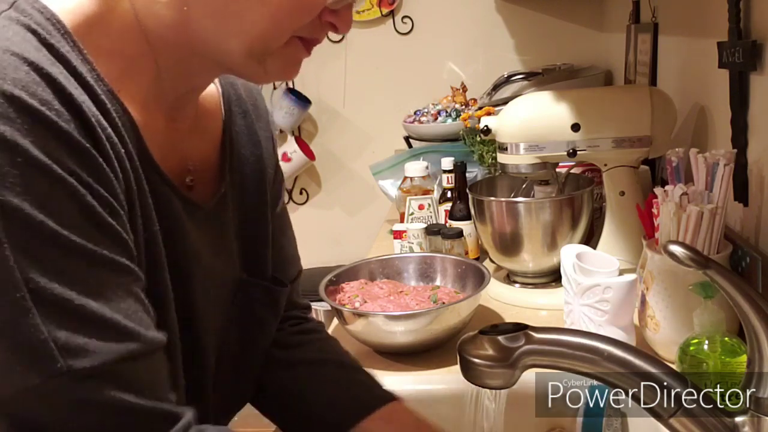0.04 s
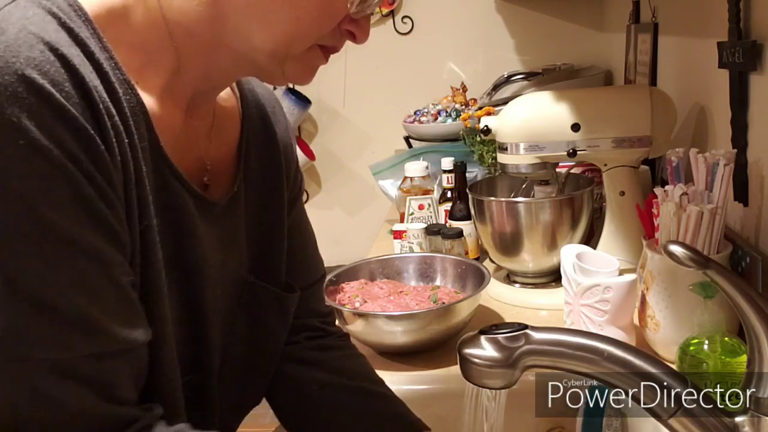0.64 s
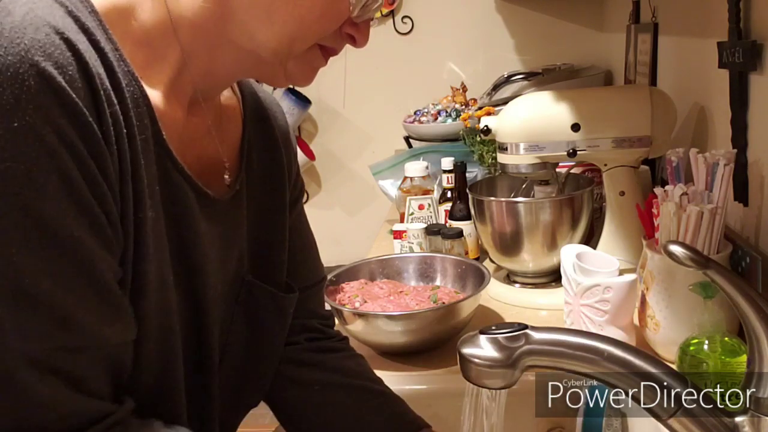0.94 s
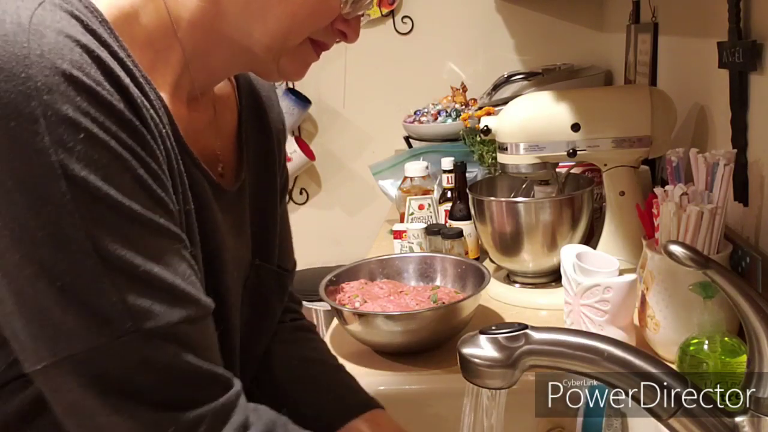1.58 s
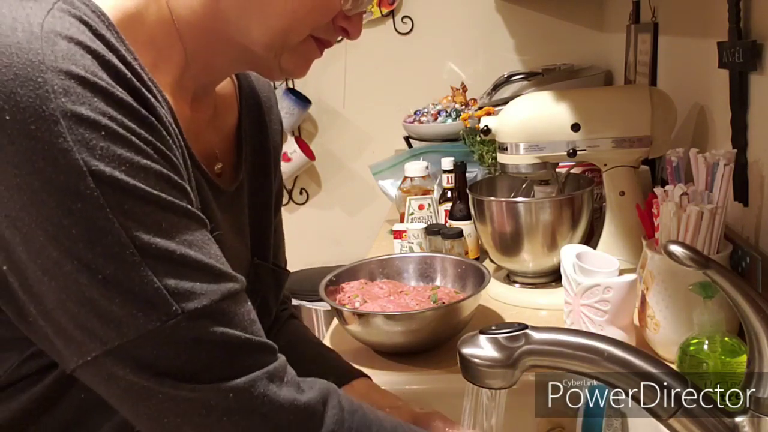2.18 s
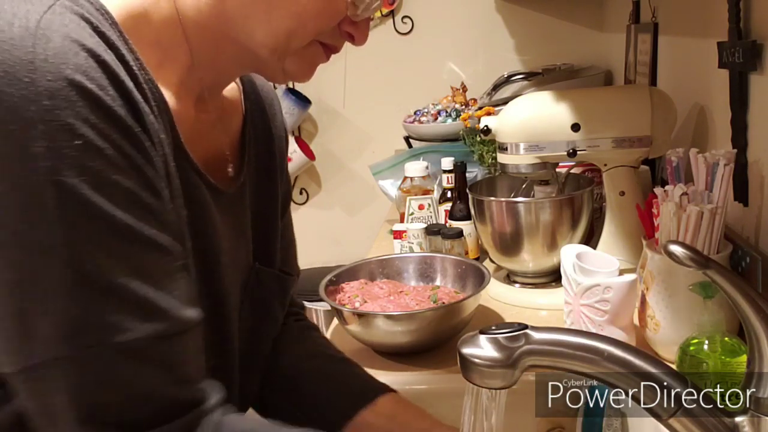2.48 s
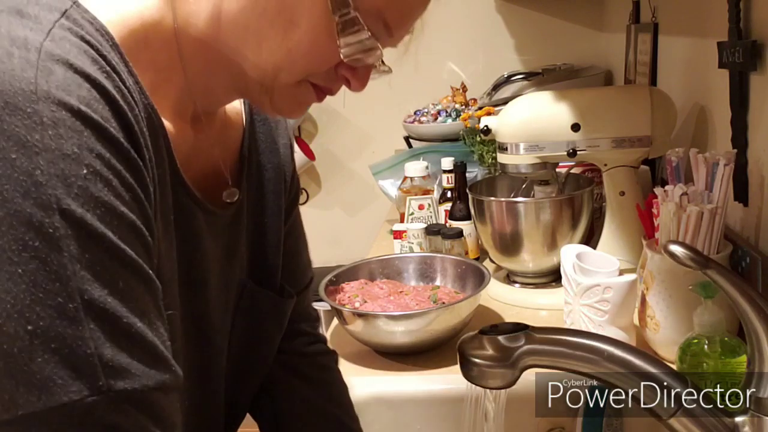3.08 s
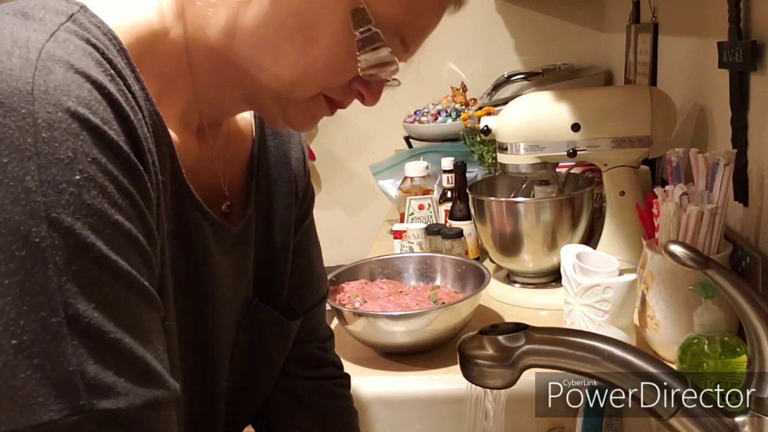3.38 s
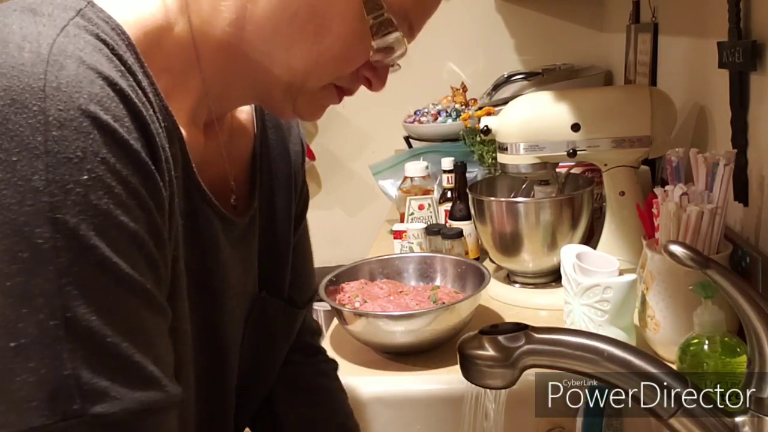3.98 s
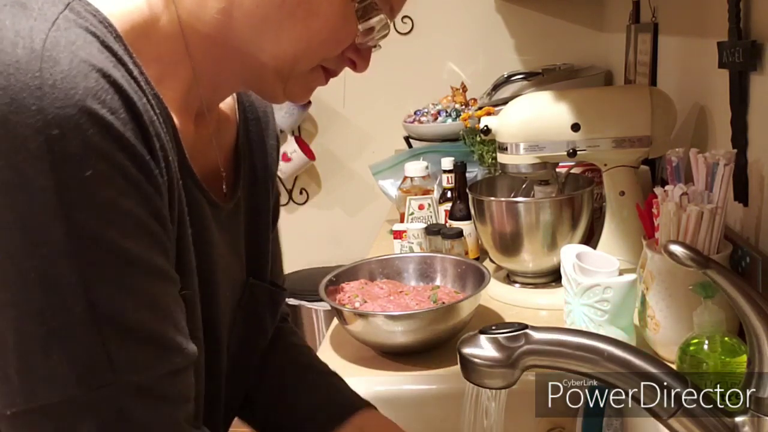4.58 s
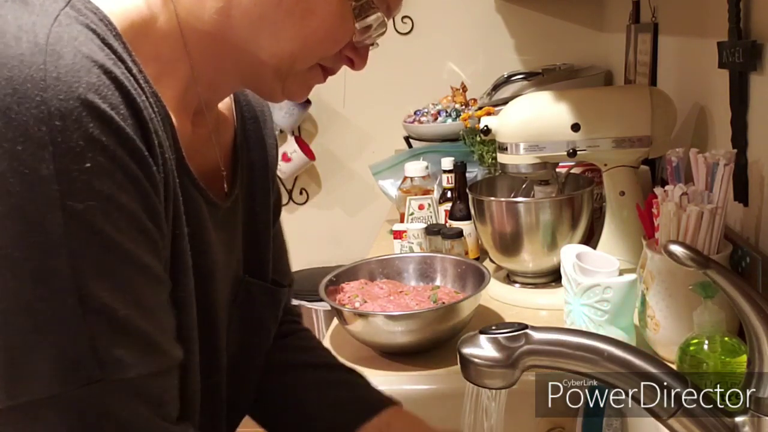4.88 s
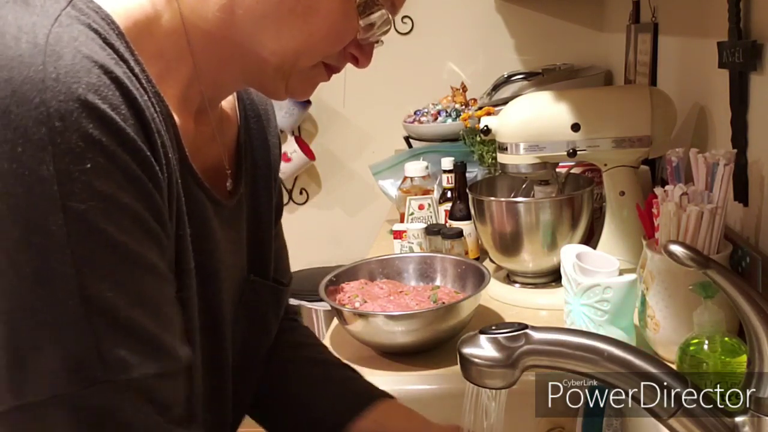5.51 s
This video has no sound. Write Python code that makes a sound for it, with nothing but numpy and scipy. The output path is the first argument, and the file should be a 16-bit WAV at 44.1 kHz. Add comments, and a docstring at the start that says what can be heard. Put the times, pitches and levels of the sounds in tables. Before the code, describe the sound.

Hands rinse under a running kitchen faucet, with wet slaps, squelches and water drumming on the basin over a steady fizz.

```python
"""Washing hands under a kitchen tap

The airy stream fizzes and the tap's valve sings, with the sink close by on the left.
Water falling from the hands splashes, glugs and drums on the basin. Wet palms squelch,
something small clinks twice, and the sink and kitchen echo over a low hum."""
import sys
import numpy as np
from scipy import signal
from scipy.fft import rfft, irfft, next_fast_len
from scipy.io import wavfile
from scipy.ndimage import map_coordinates

SR = 44100
rng = np.random.default_rng(int(sys.argv[2]) if len(sys.argv) > 2 else 0)


def dump(signal):
    """Clip the signal to [-1, 1] and save it as 16-bit WAV at the path in sys.argv[1]."""
    limited = np.clip(np.atleast_2d(signal).T, -1, 1)
    pcm = np.round(limited * 32767).astype(np.int16)
    wavfile.write(sys.argv[1], SR, pcm)


N = 249165

# tone colours, from bass to treble: (frequency [Hz], level [dB])
RUMBLE_TONE = [(38, -40), (55, -28), (80, -10), (135, 3.5), (300, -8.5), (400, 1.5), (580, -13), (800, -31),
               (1100, -8), (1500, -15), (8000, -45)]
SPLATTER_TONE = [(900, -25), (3000, -4), (8000, -27)]
PALM_TONE = [(300, 7), (650, 5), (850, 19), (1200, 2.5), (1800, 17.5), (2600, 11.5), (5000, -43)]
FIZZ_TONE = [(1200, -77), (2200, -9), (3400, -3.5), (4500, -4), (6300, 3), (8000, 1.5), (11000, 7.5),
             (15500, 5.5)]
SLOSH_TONE = [(350, -6.5), (800, 16), (1200, 13), (2600, 4), (4500, 16), (8000, -11)]
SLAP_TONE = [(500, -11), (1500, -9), (2500, 9.5), (4300, 10.5), (6500, 10), (9000, 5.5), (15500, -8)]
MIST_TONE = [(4000, -50), (7000, 17), (9500, 21), (15500, 17.5)]
VALVE_TONE = [(600, 12), (920, 21), (1350, -29), (1800, -26)]
THUD_TONE = [(30, -5.5), (100, -12.5), (400, -9.5), (800, -12), (2000, -44)]  # water strikes softly
# how things ring: (pitch [Hz], width [Hz], level [dB])
VALVE_RINGS = [(938, 24, 0), (1330, 60, -19)]
FLOOR_RINGS = [(70, 74, -41), (134.6, 43.4, 0), (150, 48, -3.5)]  # the floor of the sink
HOLLOW_RINGS = [(222, 42, -3), (268, 38, 0), (405, 60, -23)]  # the low, hollow glugging of water plunging into the sink
# how loudness changes: (time [s], level [dB])
SONG_LEVEL = [(0.4, -55.5), (1.2, -53.5), (2.9, -53.5), (3.3, -55.5)]  # the valve, later shielded by the hands
SPRAY_LEVEL = [(0.0, -48.5), (0.38, -48), (0.55, -49.5), (1.67, -43), (2.39, -41.5), (2.66, -42),
               (3.07, -40.5), (3.68, -42), (4.53, -43.5), (4.78, -40), (5.29, -39.5), (5.65, -45)]  # louder as the hands move deeper into the stream
SLOSH_LEVEL = [(0.0, -57.5), (1.04, -59), (3.6, -48.5), (3.96, -49), (4.59, -46.5), (5.65, -51.5)]  # coarser water running over the hands
# the spray eases as the hands leave the stream: (middle time [s], length [s])
LULLS = [(0.762, 0.035), (1.494, 0.02), (1.907, 0.023), (2.107, 0.055), (2.557, 0.12), (2.813, 0.069),
         (3.067, 0.037), (3.973, 0.055), (4.416, 0.12), (4.536, 0.03), (4.658, 0.019), (5.181, 0.05)]
# water pouring off the hands:
# (time [s], length [s], floor level [dB], hollow glugging level [dB], thinning [dB/s])
POURS = [(3.127, 0.68, -36, -38.5, 26), (3.71, 0.53, -45.5, -50.5, -4)]
# single blobs of water landing in the sink: (time [s], level [dB])
DOLLOPS = [(1.08, -33), (1.324, -42), (1.425, -37.5), (1.71, -45), (2.12, -40.5), (2.409, -34),
           (2.777, -35), (3.148, -36.5), (3.286, -27), (3.439, -28), (3.597, -28.5), (4.67, -37.5),
           (5.525, -36.5)]
# large bubbles, from bright pings to hollow plops: (time [s], pitch [Hz], level [dB])
BIG_BUBBLES = [(3.305, 4950, -22.5), (3.396, 3550, -27), (3.432, 4240, -29), (3.433, 5480, -20),
               (3.473, 3920, -25), (3.605, 5670, -20), (3.769, 4330, -18), (4.569, 1034, -34),
               (4.578, 1504, -30), (4.79, 890, -32), (4.799, 7550, -24.5), (4.889, 4150, -31),
               (4.896, 882, -28.5), (5.227, 5370, -19), (5.44, 840, -29.5)]
# light knocks: (time [s], pitch [Hz], level [dB], top ring pitch [Hz], top ring level [dB])
CLINKS = [(4.199, 4697, -23.5, 12385, -23.5), (4.224, 4325, -23.5, 11820, -31)]
# the lower rings of a clink: (pitch multiple, level [dB], time to fade by 60 dB [s])
CLINK_RINGS = [(1.0, 0, .13), (1.26, -8, .11), (1.62, -13, .08)]
# wet palms pressing together: (time [s], level [dB], pitch of their hollow [Hz])
SQUELCHES = [(0.243, -34, 950), (0.37, -46.5, 1990), (1.089, -37.5, 1790), (1.712, -44, 2450),
             (1.748, -38.5, 2170), (2.411, -38.5, 2500), (4.567, -29.5, 1170), (4.583, -35, 1610),
             (4.686, -36, 1845), (4.769, -38.5, 1780), (4.894, -33, 905), (5.118, -36, 1500),
             (5.21, -37, 900), (5.401, -33.5, 1420), (5.429, -34.5, 990), (5.56, -36.5, 4500)]
# big slaps of water: (time [s], level [dB], pitch [Hz], mist level [dB], swell time [s])
SPLASHES = [ (0.657, -38.5, 6260, 6, 0.0074), (0.844, -32, 7800, 5, 0.0038),
            (1.541, -24, 3360, 2.5, 0.0012), (1.792, -32, 4200, -18, 0.0077),
            (2.379, -23.5, 6260, -1, 0.0019), (2.6434, -23.5, 6530, 3, 0.00097),
            (2.925, -20.5, 4530, 6, 0.0025), (3.005, -31.5, 8700, 6, 0.0023),
            (3.108, -31, 4370, 7.5, 0.0065), (3.135, -20, 5660, 1, 0.0022),
            (3.431, -18, 4400, -0.5, 0.0021), (3.467, -24.5, 5240, 0, 0.0083),
            (3.603, -19, 7700, -4, 0.0027), (3.766, -21.5, 4580, -1.5, 0.002),
            (4.221, -32, 7300, -2, 0.012), (4.671, -22, 4160, 0, 0.0029), (4.793, -28.5, 5800, -15, .004),
            (4.877, -24, 4250, -1, 0.0054), (5.015, -24, 4240, 1, 0.0028), (5.131, -21, 4860, -12, 0.0024),
            (5.285, -23.5, 7060, 6.5, 0.0018), (5.354, -21, 4870, -1, 0.0035)]
# small flicks of water between them: (time [s], level [dB], pitch [Hz])
FLICKS = [(0.201, -33.5, 2160), (0.407, -32.5, 6250), (0.69, -34.5, 4130), (0.973, -33, 7470),
          (1.044, -33.5, 5250), (1.15, -26.5, 5550), (1.434, -37, 3250), (1.626, -29.5, 3270),
          (1.692, -28.5, 6260), (1.827, -26.5, 4940), (1.936, -34, 3520), (2.004, -26.5, 4700),
          (2.034, -26, 2720), (2.164, -26, 3370), (2.485, -28, 2340), (2.561, -30, 6540),
          (2.724, -28, 5440), (2.75, -26.5, 8050), (2.855, -26.5, 4580), (2.873, -33, 5210),
          (2.916, -22, 4900), (2.929, -25.5, 2180), (3.022, -25, 7440), (3.128, -24.5, 6260),
          (3.179, -26.5, 3560), (3.398, -25.5, 6200), (3.741, -24, 4630), (3.877, -26, 3100),
          (3.89, -26, 3440), (4.024, -30, 3600), (4.454, -29.5, 2870), (4.731, -29, 7030),
          (4.83, -27.5, 5400), (4.989, -24.5, 5800), (5.1, -28, 5500), (5.114, -26, 5360),
          (5.483, -23.5, 5400), (5.509, -27, 4810), (5.544, -25.5, 4220), (5.575, -29, 2680)]
# how long echoes last: (frequency [Hz], time to fade by 60 dB [s])
KITCHEN_FADE = [(200, 0.17), (3000, 0.31), (14000, 0.091)]
SINK_FADE = [(1000, 0.15), (10000, 0.1)]
# how much louder the left side is: (frequency [Hz], left minus right [dB])
LEFT_BOOST = [(60, 7.5), (600, 5.5), (930, 10), (1700, 5), (2500, 8.5), (7000, 11.5), (9000, 0), (15000, 3)]
# how alike left and right sound: (frequency [Hz], likeness [0 to 1])
LIKENESS = [(100, 0.94), (250, 0.87), (500, 0.74), (1000, 0.5), (2500, 0.038), (10000, 0.035)]


def amp(db):
    """Turn decibels into a number to multiply by."""
    return 10 ** (np.asarray(db) / 20)


def unit(x):
    """Scale a sound to an average power of 1."""
    return x / np.sqrt(np.mean(x ** 2) + 1e-20)


def along(points, hz):
    """Read between (frequency, value) points, with octaves evenly spaced."""
    f, v = np.transpose(points)
    return np.interp(np.log(hz + 1), np.log(f + 1), v)


def curve(points):
    """Join (time, value) points into one value per sample."""
    return np.interp(np.arange(N) / SR, *np.transpose(points))


def wobble(rate, n=N):
    """A smooth curve through `rate` random values a second."""
    return map_coordinates(rng.standard_normal(int(n * rate / SR) + 4), [np.arange(n) * rate / SR])


def filtered(x, response):
    """Multiply each frequency in a sound by response(frequency)."""
    n = x.shape[-1]
    m = next_fast_len(n + min(n // 4, SR // 8), True)
    return irfft(rfft(x, m) * response(np.fft.rfftfreq(m, 1 / SR)), m)[..., :n]


def coloured(x, tone):
    """Give a sound a tone colour."""
    return filtered(x, lambda hz: amp(along(tone, hz)))


def resonate(x, rings):
    """Make a sound ring at each (pitch, width, level)."""
    return filtered(x, lambda f: sum(
        (-1) ** k * amp(db) * 1j * f * width / (hz * hz - f * f + 1j * f * width)
        for k, (hz, width, db) in enumerate(rings)))


def add(track, s, sound):
    """Mix a sound into the track at s seconds."""
    part = track[:, max(round(s * SR), 0):][:, :sound.shape[-1]]
    part += sound[:, :part.shape[-1]]


def droplets(n, rate, spread_db):
    """Tiny hits of unequal size, `rate` a second, each with its own strength in the two channels."""
    chance, size = rng.random(n), rng.uniform(-0.43, 1, n)
    return unit((chance < rate / SR) * amp(spread_db * size) * rng.standard_normal((2, n)))


def burst(t, swell_s, linger_db, fade_s=0.05):
    """The loudness of a slap: it swells and lets go, and its scattered drops land a little later."""
    u = t / swell_s
    return u * np.exp(1 - u) + amp(linger_db - 60 * t / fade_s) * (1 - np.exp(-u))


def echoes(x, fade_times):
    """Echoes fade at each frequency's own speed and keep changing, as when arms move nearby."""
    out, hop = np.zeros((2, N)), SR // 8
    for start in range(0, N, hop):
        hz, t, noise = signal.stft(rng.standard_normal((2, SR // 4)), SR, nperseg=128)
        fade = amp(-60 * t / along(fade_times, hz)[:, None])
        tail = signal.istft(noise * fade, SR, nperseg=128)[1]
        tail /= np.linalg.norm(tail[0])
        add(out, start / SR + 0.001504, signal.fftconvolve(x[:, start:start + hop], tail, axes=1))
    return out


def left_and_right(pair, lead_s=0.00009):
    """Two channels become left and right: alike in the bass, louder and earlier on the sink's side."""
    turn = lambda hz: np.arccos(along(LIKENESS, hz)) / 2
    mid, side = filtered(pair, lambda hz: np.array([np.cos(turn(hz)), np.sin(turn(hz))]))
    lean = lambda hz: amp(np.outer([.5, -.5], along(LEFT_BOOST, hz)))
    lead = lambda hz: np.exp(2j * np.pi * np.outer([.5, -.5], hz) * lead_s)
    stereo = np.array([mid + side, mid - side])
    return filtered(stereo, lambda hz: lead(hz) * lean(hz) / lean(hz).mean(axis=0))


def background(hum_hz=59):
    """The kitchen rumbles and an appliance hums."""
    hum = amp(-61 + 3.5 * wobble(7)) * np.sin(2 * np.pi * hum_hz * np.arange(N) / SR)
    rumble = amp(-55) * unit(coloured(rng.standard_normal((2, N)), RUMBLE_TONE))
    return rumble + np.outer([1, 0], hum)  # the first channel goes to both left and right


def valve():
    """The tap's valve keeps itself ringing, so its note is steadier than plain noise."""
    ringing = resonate(rng.standard_normal((2, N)), VALVE_RINGS)
    song = signal.hilbert(coloured(ringing, VALVE_TONE))
    steadied = song.real / np.sqrt(np.abs(song))  # abs(song) is its strength at each moment
    return amp(curve(SONG_LEVEL)) * unit(steadied)


def pours(rise_s=0.1, fall_s=0.38):
    """How strongly poured water drums and glugs: each pour starts, gushes unevenly and stops."""
    t, force = np.arange(N) / SR, np.zeros((2, N))
    for s, length, floor_db, hollow_db, thinning in POURS:
        flow = np.interp(t - s, [0, rise_s, length, length + fall_s], [0, 1, 1, 0])
        force += amp([[floor_db], [hollow_db]]) * flow * amp(-thinning * np.maximum(t - s, 0))
    return force * amp(1.7 * wobble(22.15))


def basin():
    """Water drums on the sink's floor and plunges in with a hollow glugging, loudest when it pours."""
    t, spray_db = np.arange(N) / SR, spray_level()
    floor_pour, hollow_pour = pours()
    dollops = sum(amp(db - 9.5) * burst(np.maximum(t - s, 0), swell_s=0.011, linger_db=-33)
                  for s, db in DOLLOPS)
    floor_force = amp(-5.5) * floor_pour + amp(spray_db - 17.5)
    hollow_force = amp(1) * (hollow_pour + dollops) + amp(spray_db - 14)
    thuds = lambda: coloured(droplets(N, rate=1800, spread_db=8.5), THUD_TONE)
    floor = floor_force * unit(resonate(thuds(), FLOOR_RINGS))
    hollow = hollow_force * unit(resonate(thuds(), HOLLOW_RINGS))
    return floor + hollow


def splatter():
    """Poured water spatters where it lands on the wet sink."""
    return amp(-14) * pours()[0] * unit(coloured(droplets(N, rate=710, spread_db=16), SPLATTER_TONE))


def plops(glug_hz=255, rise_per_s=0.33):
    """Big bubbles ring and each dollop drags down air that glugs: short, slightly rising notes."""
    out, t = np.zeros((2, N)), np.arange(SR // 10) / SR
    glugs = [(s, glug_hz * 2 ** rng.normal(0, 0.15), db - 6) for s, db in DOLLOPS]
    for s, hz, db in BIG_BUBBLES + glugs:
        u = t / 0.0042 * (hz / 1000) ** 0.19  # lower bubbles swell more slowly
        waver = 0.01 * rng.standard_normal(len(t))
        phase = np.cumsum(2 * np.pi * hz * (1 + rise_per_s * t) / SR + waver)
        add(out, s, np.outer([1, 0], amp(db) * u * np.exp(1 - u) * np.sin(phase)))
    return out


def clinks(rise_s=0.0065, top_fade_s=0.15):
    """Two light, bright knocks; the water cuts their ring short and makes it waver."""
    out, t = np.zeros((2, N)), np.arange(SR // 5) / SR
    for s, pitch, db, top_hz, top_db in CLINKS:
        rings = [(pitch * multiple, db + level, fade_s) for multiple, level, fade_s in CLINK_RINGS]
        for hz, level, fade_s in rings + [(top_hz, top_db, top_fade_s)]:
            waver = np.cumsum(rng.standard_normal((2, len(t))), axis=1) * hz / pitch * 0.03
            loudness = amp(level - 60 * t / fade_s) * (1 - np.exp(-t / rise_s))
            add(out, s, loudness * np.sin(2 * np.pi * hz * t + waver))
    return out


def squelches():
    """Water squeezed between the palms breaks into spits that gurgle through their hollow."""
    out, t = np.zeros((2, N)), np.arange(SR // 7) / SR
    squeeze = burst(t, swell_s=0.007, linger_db=-16)
    for s, db, hz in SQUELCHES:
        spits = unit(amp(5 * np.tanh(wobble(190, len(t)))))
        drops = droplets(len(t), rate=2000, spread_db=-2)
        hollow = amp(-8.5) * unit(coloured(drops, PALM_TONE))
        gurgle = amp(-9.5) * unit(resonate(drops, [(hz, hz * 0.14, 0)]))
        fizz = amp(-2.5) * unit(coloured(droplets(len(t), rate=2500, spread_db=4), SLAP_TONE))
        add(out, s, amp(db) * squeeze * spits * (hollow + gurgle + fizz))
    return out


def small_bubbles(rate, centre_hz, cycles, spread_db, pool=5000):
    """Small bubbles burst, about `rate` a second, and ring for a few cycles each."""
    t = np.arange(SR // 150) / SR
    when, chance, first, second = rng.random((pool, 4)).T
    pitch, size = rng.standard_normal((pool, 2)).T
    hz = np.clip(centre_hz * np.exp(pitch / 2), 1500, 15000)[:, None]
    gain = amp(spread_db * np.minimum(size, 2)) * (chance < rate * N / SR / pool)
    rings = gain[:, None] * np.sin(2 * np.pi * hz * t) * np.exp(-hz * t / cycles)
    at = ((when * N).astype(int)[:, None] + np.arange(len(t))).ravel()
    # add each ring at its own time, with its own strength in each channel
    pair = [np.bincount(at, (rings * (share[:, None] - .5)).ravel(), N)[:N] for share in (first, second)]
    return unit(np.array(pair))


def spray_level(lull_db=-5.5):
    """The spray's level in decibels at each sample, dipping at each lull."""
    t = np.arange(N) / SR
    dips = sum(np.exp(-(2 * (t - s) / length) ** 2) for s, length in LULLS)
    return curve(SPRAY_LEVEL) - 0.65 + lull_db * dips


def stream():
    """The airy jet: droplets, fine ticks and bursting bubbles in uneven spurts, over a coarser slosh."""
    spray_db = spray_level() + 0.067 * wobble(6)
    slosh_db = curve(SLOSH_LEVEL) + 1 + spray_level() - curve(SPRAY_LEVEL)  # shares the spray's lulls
    spurts = amp(1.4 * wobble(45) + 1.3 * wobble(190))
    patter = unit(coloured(droplets(N, rate=7400, spread_db=27), FIZZ_TONE))
    ticks = amp(-9) * unit(coloured(droplets(N, rate=160, spread_db=6), MIST_TONE))
    popping = small_bubbles(rate=850, centre_hz=5000, cycles=6, spread_db=2.2)
    froth = amp(-3) * unit(coloured(popping, FIZZ_TONE))
    slosh = unit(coloured(droplets(N, rate=900, spread_db=9.5), SLOSH_TONE))
    return spurts * (amp(spray_db) * (patter + ticks + froth) + amp(slosh_db) * slosh)


def splashes(flick_mist_db=-3, flick_swell_s=0.0019):
    """Each slap is a quickly fading shower of drops and mist; air pockets give it a brief pitch."""
    out, t = np.zeros((2, N)), np.arange(SR // 12) / SR
    flicks = [(s, db, hz, flick_mist_db, flick_swell_s) for s, db, hz in FLICKS]
    for s, db, hz, mist_db, swell_s in SPLASHES + flicks:
        slap = unit(coloured(droplets(len(t), rate=12000, spread_db=3), SLAP_TONE))
        lower_hz, width_hz = hz * rng.uniform(0.68, 0.9), hz * 0.14
        pockets = unit(resonate(slap, [(hz, width_hz, 0), (lower_hz, width_hz / 2, -7)]))
        mist = unit(coloured(rng.standard_normal((2, len(t))), MIST_TONE))
        shower = burst(t, swell_s, linger_db=-16) * (amp(-12.5) * slap + amp(mist_db - 7) * mist)
        ring = amp(-8) * burst(t, swell_s, linger_db=-23) * pockets
        add(out, s, amp(db) * (shower + ring))
    return out


def scene():
    """The water sounds ring briefly in the sink and fade in the kitchen."""
    water = stream() + splashes() + squelches() + splatter() + clinks()
    sink = amp(-2.5) * echoes(water, SINK_FADE)
    bubbles = plops()
    kitchen = amp(-11.5) * echoes(water + bubbles / 2, KITCHEN_FADE)
    return left_and_right(water + bubbles + sink + kitchen + basin() + valve() + background())


def record(dry):
    """Cut away the very highest treble."""
    return filtered(dry, lambda hz: hz < 15750)


dry = scene()
out = record(dry)
dump(out)
```